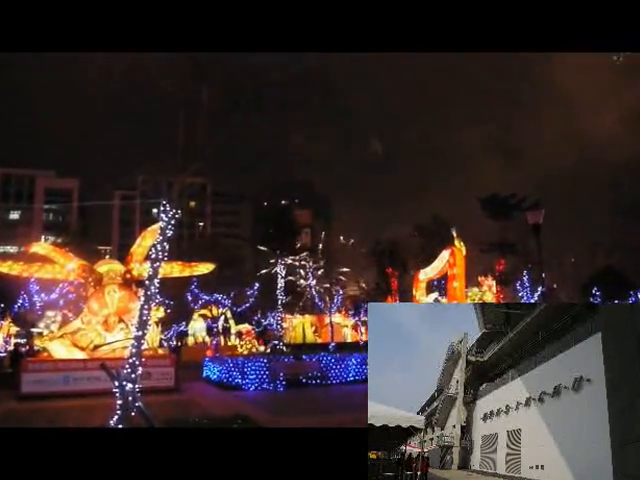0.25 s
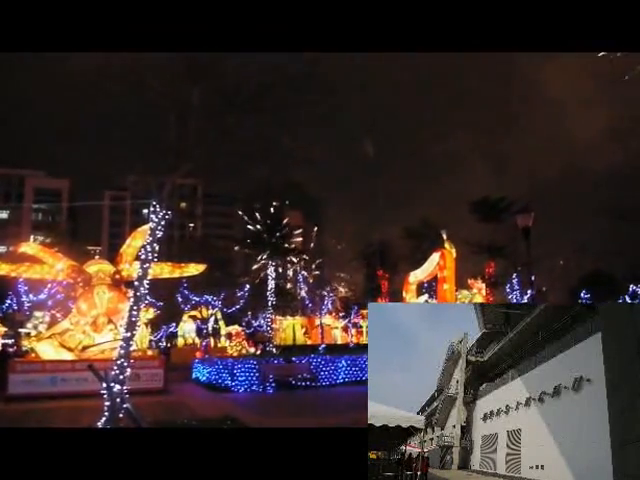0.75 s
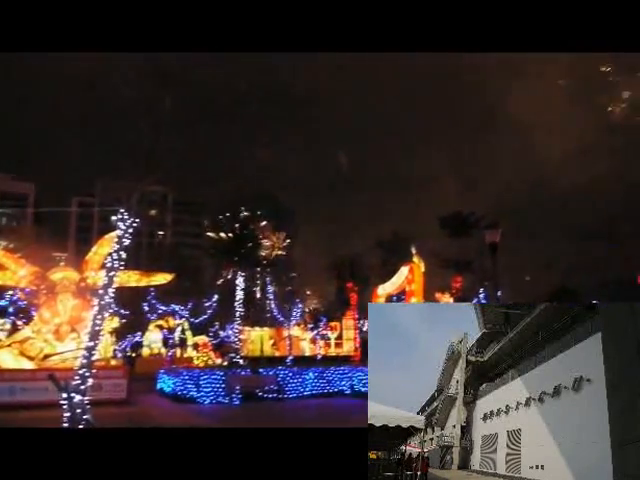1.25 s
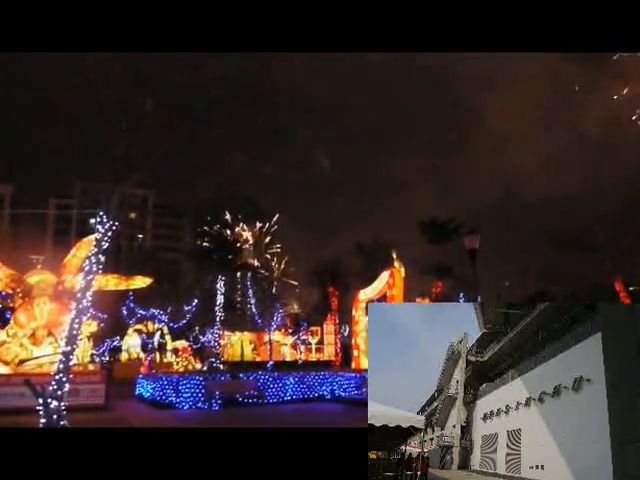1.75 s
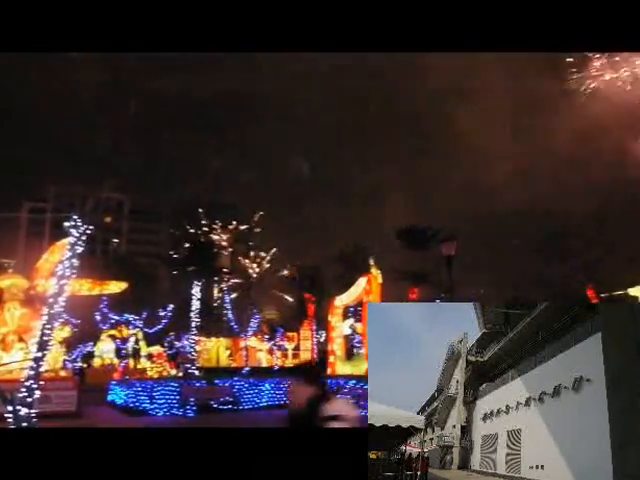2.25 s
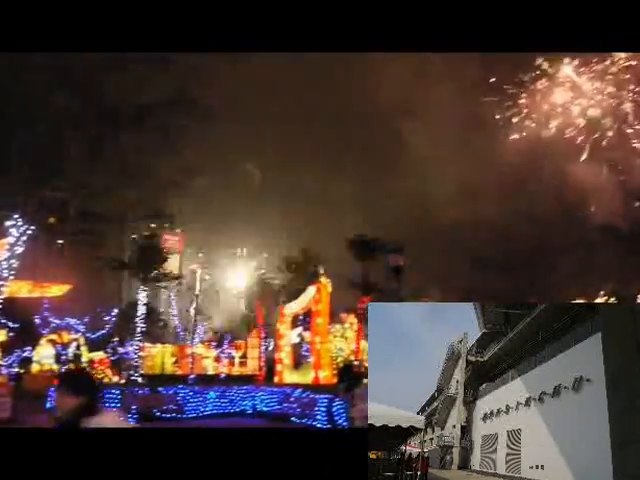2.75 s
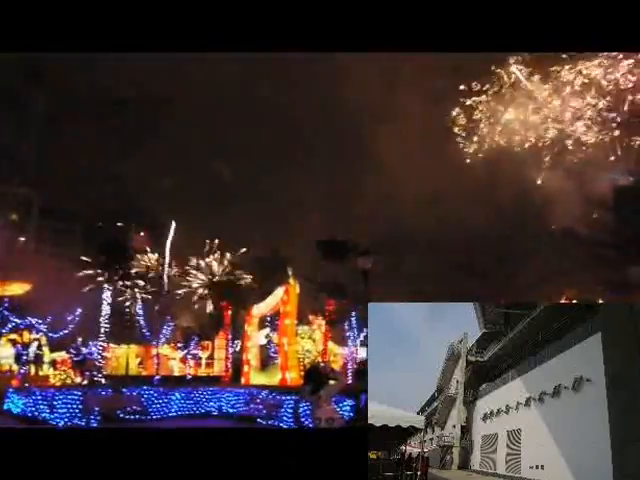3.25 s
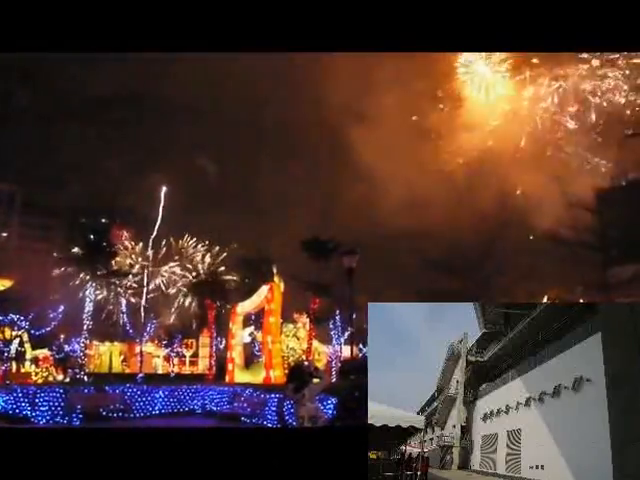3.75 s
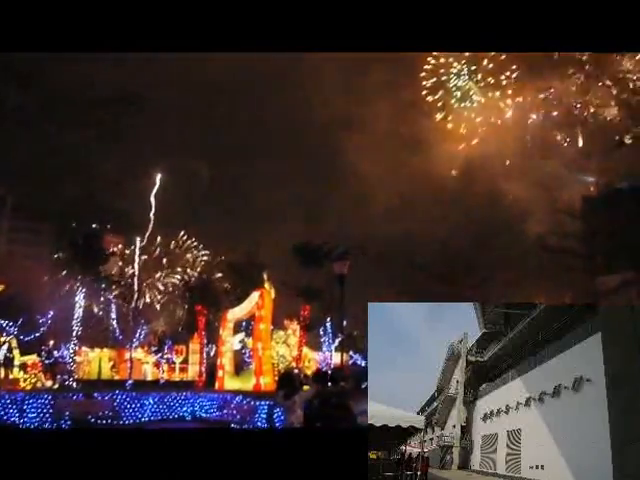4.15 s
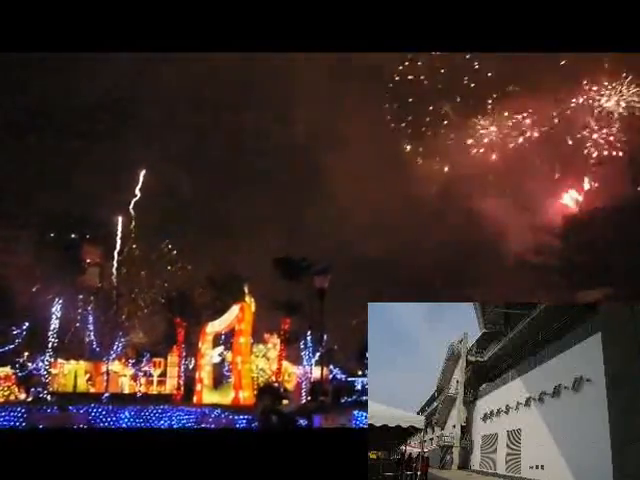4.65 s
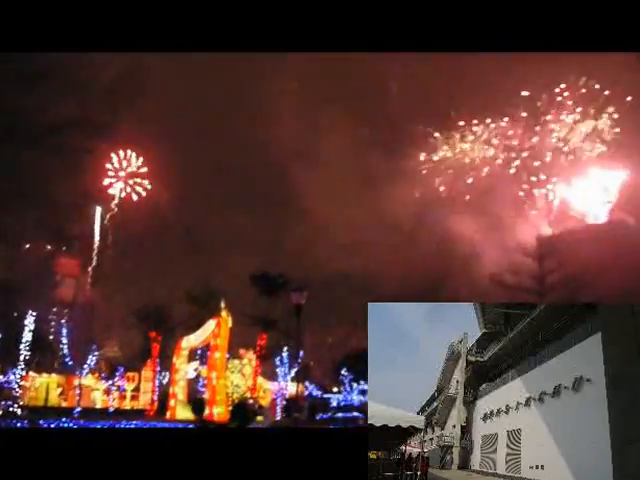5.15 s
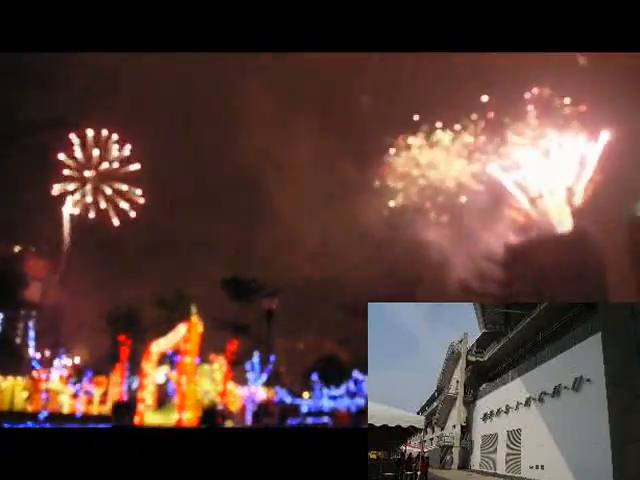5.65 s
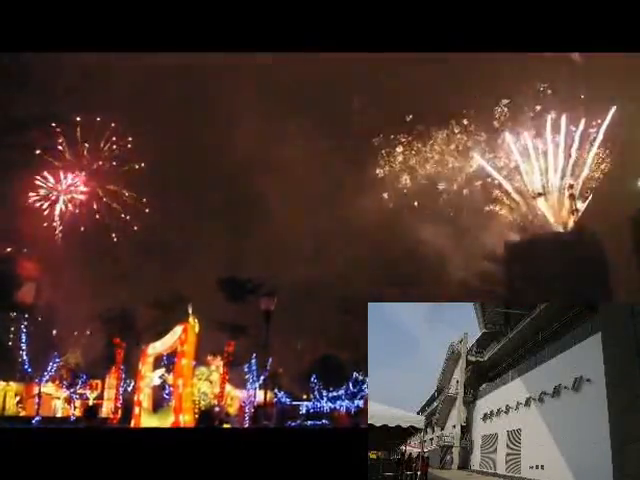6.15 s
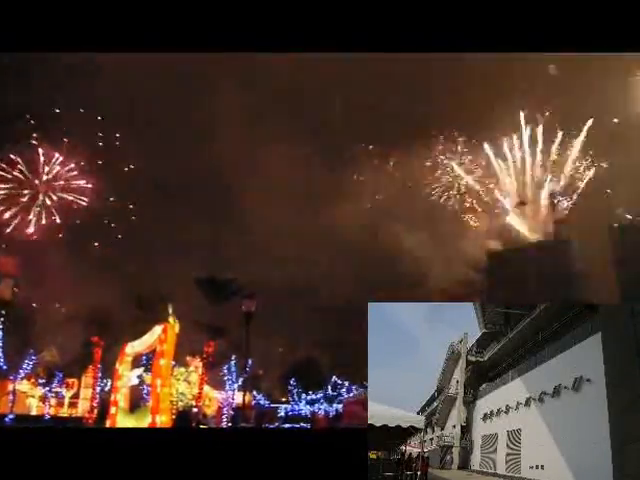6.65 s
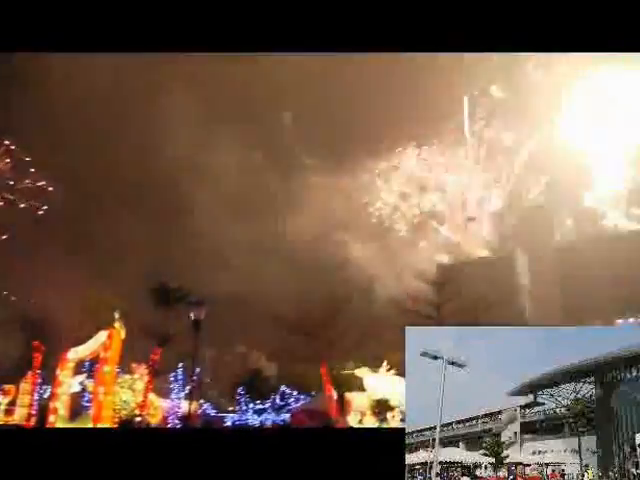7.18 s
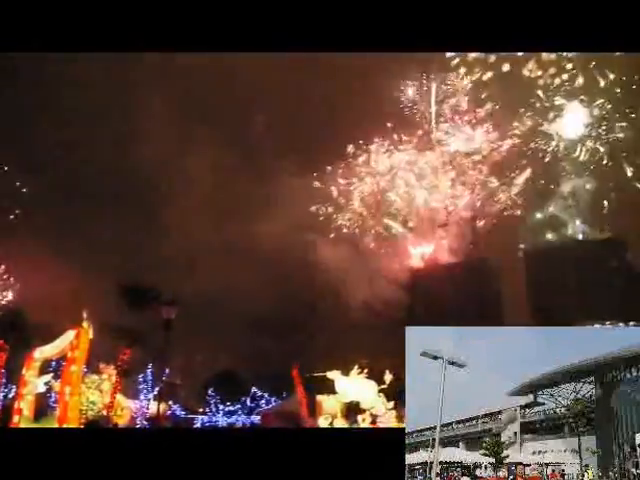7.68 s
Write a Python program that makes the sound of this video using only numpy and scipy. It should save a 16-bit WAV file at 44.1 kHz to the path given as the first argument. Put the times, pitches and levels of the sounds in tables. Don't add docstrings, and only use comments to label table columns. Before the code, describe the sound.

Dense night fireworks over an open square: dry sharp bangs over a constant dull crackling rattle, thinning near six seconds, then a furious closing barrage.

```python
import sys
import numpy as np
from scipy import signal
from scipy.fft import rfft, irfft, next_fast_len
from scipy.io import wavfile
from scipy.ndimage import uniform_filter1d

SR = 44100
rng = np.random.default_rng(int(sys.argv[2]) if len(sys.argv) > 2 else 0)


def master(y):
    cut = np.clip(np.atleast_2d(y).T, -1, 1)
    pcm = np.round(cut * 32767)
    wavfile.write(sys.argv[1], SR, pcm.astype(np.int16))


def linear_from_db(decibels):
    return 10 ** (np.asarray(decibels, float) / 20)


N = 349272


def rms_one(x):
    return x / np.sqrt(np.mean(x ** 2) + 1e-20)


def at_hz(points, hz):
    point_hz, value = np.transpose(points)
    return np.interp(np.log(hz), np.log(point_hz), value)


def band(x, low_hz, high_hz, order=2):
    return signal.sosfilt(signal.butter(order, [low_hz, high_hz], "band", fs=SR, output="sos"), x)


def coloured(x, points):
    size = next_fast_len(N)
    hz = np.maximum(np.arange(size // 2 + 1) * SR / size, 1)
    return irfft(rfft(x, size) * linear_from_db(at_hz(points, hz)), size)[..., :N]


def add(out, at_s, sound):
    i = int(round(at_s * SR))
    out[i:i + len(sound)] += sound[:max(len(out) - i, 0)]


def shock(length_ms, size=700, fade=1.0):
    t = np.arange(size) / SR * 1000 / max(length_ms, .03)
    return (1 - t) * np.exp(-fade * t)


def scatter(draw, first_ms, t60_ms, size=900):
    t = np.arange(size) / SR * 1000
    returns = draw * (t > first_ms) * linear_from_db(-60 * (t / t60_ms) ** 2)
    return returns / np.sqrt(np.sum(returns ** 2))


def bursts():
    cracks, edges, thumps = np.zeros((3, N))
    every = every_burst()
    draws = rng.standard_normal((len(every), 3, 900))
    for (s, db, thump_db, edge_db), (a, b, c) in zip(every, draws):
        returns_db = -14.5 - .55 * max(db, -18) + 0.38 * thump_db
        sparse = a * (np.abs(b) > 1.5)
        returns = scatter(sparse, first_ms=1.6, t60_ms=28.0) * linear_from_db(min(returns_db, -7) + 8.0)

        direct = linear_from_db(1.46 * min(db + 12.5, 0))
        returns[0] = direct
        bounce = 8 + (np.abs(a[:4]) * [6, 18, 35, 60]).astype(int)
        returns[bounce] += direct * linear_from_db(returns_db / 3 - 2.0) * np.tanh(2 * b[:4])
        add(cracks, s, linear_from_db(db) * returns)
        duller = np.exp(-np.arange(900) / 250)
        add(edges, s, linear_from_db(db + edge_db) * returns * duller)

        low = scatter(c, first_ms=1.2, t60_ms=13.5 - 0.33 * db)
        low[0] = 1.14 * direct
        add(thumps, s, linear_from_db(db + min(thump_db, 3)) * low)
    crack = band(np.convolve(cracks, shock(0.32, fade=0.28))[:N], 870, 3450)
    edge = band(edges, 1350, 4830, order=3)
    thump = band(np.convolve(thumps, shock(0.79))[:N], 185, 662, order=1)
    return linear_from_db(8.5) * crack + linear_from_db(14.5) * edge + linear_from_db(17.0) * thump


def every_burst():
    # (time [s], crack peak [dB], thump re crack
    # [dB], edge re crack [dB])
    overhead = [(0.0492, -10, -4, -8.5), (0.2501, -7.5, -5.5, -15), (0.3696, -5.5, -10, -11),
                (0.4493, -6.5, -7, -11), (0.5739, -6.5, -26.5, -16), (0.948, -1.5, -11.5, -9),
                (1.0176, -6, -4.5, -46), (1.4365, -2, -11.5, -9), (1.8513, -7.5, -7, -13),
                (2.0203, -7, -8, -2.5), (2.2187, -11.5, -0.5, -3), (2.4552, -3, -9, -17),
                (2.5353, -9, -5.5, -16), (2.699, -10.5, -6.5, -4), (2.7943, -5.5, -8.5, -8),
                (3.032, -3.5, -10, -4.5), (3.0734, -3.5, -14, -14), (3.2944, -6, -7.5, -3),
                (3.4907, -0.5, -13.5, -21), (3.5002, -5, -9.5, -21), (3.7322, -9.5, -6, -20),
                (3.7836, -5.5, -10.5, 1), (3.9615, -9.5, -11, -24), (4.1648, -2.5, -21.5, -7),
                (4.47, -10.5, -3.5, -9), (5.1257, -18.5, 0.5, -16), (5.2533, -7, -8.5, -4),
                (5.4615, -6.5, -7, -4), (5.5229, -10, -7, -5), (5.796, -12, -6.5, -11)]
    # (time [s], crack peak [dB], thump re crack [dB], edge re crack [dB])
    closing = [(6.74, -6, -4.5, -2), (6.7891, -5.5, -8.5, -7.5), (6.9036, -2, -15.5, -6),
               (6.936, -14.5, -8, -24), (6.969, -11, -2.5, 4), (6.992, -5.5, -7, -9),
               (7.1315, -14.5, -2, 2.5), (7.2348, -13.5, -5, -17), (7.268, -8, -3, 4),
               (7.3519, -10, -5, -1.5), (7.3765, -9.5, -7, -1), (7.4133, -8, -3.5, -8),
               (7.4225, -9, -6, -6), (7.4635, -13, -4.5, 5), (7.4676, -7.5, -17, -11),
               (7.546, -10.5, -5, -1), (7.6204, -9.5, -5, -14), (7.6268, -25, 3, -7),
               (7.6613, -0.5, -10.5, -7.5), (7.6762, -4.5, -8, -9), (7.6941, -33, 1, 2),
               (7.734, -17, -6, -14), (7.7413, -10, -9.5, -14), (7.7685, -11.5, -2, -5),
               (7.794, -17, -2, 0), (7.8158, -5, -14, -3.5), (7.8389, -13, 1, -2), (7.8593, -15, -1, -6),
               (7.874, -7.5, -13, -4), (7.9128, -13, -2, -17)]
    # (time [s], crack peak [dB], thump re crack [dB])
    across_square = [(0.1512, -19.5, -3), (0.3264, -14.5, -5.5), (0.5683, -15, 2), (1.8471, -10, -5.5),
                     (1.8649, -11, -7), (1.9429, -9.5, -12), (1.9843, -15, -8), (1.9899, -13.5, -8),
                     (2.0002, -15.5, -1.5), (2.0842, -13, -22), (2.4637, -17.5, 3), (2.6303, -10.5, -12.5),
                     (2.975, -14.5, -1.5), (3.131, -15, -8), (3.1349, -13.5, -1.5), (3.2163, -17.5, -6.5),
                     (3.273, -14.5, -5.5), (3.2766, -14, -13), (3.521, -13, -3), (3.5251, -24, 2),
                     (3.6298, -14, -4.5), (3.8761, -18.5, -1), (3.926, -19, -8), (4.0928, -13, -6),
                     (4.2312, -10.5, -37), (4.2818, -13, -1), (5.0845, -11, -4.5), (5.122, -15, -7),
                     (5.193, -15.5, -0.5), (5.3603, -8.5, -8)]
    # (time [s], crack peak [dB])
    behind = [(0.0242, -17), (0.346, -28), (0.7131, -17), (0.9984, -21.5), (1.1558, -27.5), (1.161, -17.5),
              (1.18, -18.5), (1.1871, -16), (2.1155, -26), (2.3124, -16), (2.3419, -24.5), (3.4121, -14),
              (3.6356, -16.5), (3.9144, -15), (3.9392, -16.5), (4.2411, -16), (4.3116, -21),
              (5.0924, -15.5), (5.9337, -17), (6.005, -19.5), (6.0599, -19), (6.0963, -15), (6.1997, -23),
              (6.2204, -16.5), (6.2303, -25), (6.3718, -16.5), (6.5709, -24), (7.2091, -18.5),
              (7.2144, -14), (7.448, -16)]

    strays_per_s, stray_db, stray_spread_db = 16, 7, 2.5
    when, luck = rng.random((int(strays_per_s * N / SR), 2)).T
    when = when * (N - 1) / SR
    stray_peak = in_time()[(when * SR).astype(int)] + stray_db + stray_spread_db * (2 * luck - 1)

    across = [(s, db, low, -4.5 + 0.51 * low) for s, db, low in across_square]
    far = [(s, db, -7, -24) for s, db in [*behind, *zip(when, stray_peak)]]
    return [*overhead, *closing, *across, *far]


def shells():
    # (time [s], peak [dB], shock length [ms])
    heavy_shells = [
        (1.4374, 0, 1.6),
        (4.2804, 16, 1.15),
        (5.1216, 14, 1.6),
        (7.2678, 14, 1.5),
        (7.4628, 14, 1.6),
        (7.913, -24, 0.71),
    ]
    out = np.zeros(N)
    for s, db, length_ms in heavy_shells:
        add(out, s, linear_from_db(db) * shock(length_ms, fade=1.65))
    return out


def whistles():
    # (time [s], length [s], start [Hz], end [Hz], level [dB])
    whistling_stars = [
        (2.14, .08, 1320, 1330, -37),
        (4.55, .15, 2620, 2400, -46),
    ]
    out = np.zeros(N)
    for s, length_s, start_hz, end_hz, db in whistling_stars:
        size = int(length_s * SR)
        waver = 250 * uniform_filter1d(rng.standard_normal(9000), size=400)[:size]
        hz = np.linspace(start_hz, end_hz, size) + waver
        tone = np.sin(2 * np.pi * np.cumsum(hz) / SR)
        add(out, s, linear_from_db(db) * np.hanning(size) ** .5 * tone)
    return out


def square(x, t60_s=1.0, start_s=0.016):
    t = np.arange(int(SR * 1.0)) / SR
    tail = rng.standard_normal(len(t)) * linear_from_db(-60 * t / t60_s) * (t > start_s)
    dull = band(tail, 140, 3500, order=1) / np.sqrt(np.sum(tail ** 2))
    return signal.fftconvolve(x, dull)[:N]


def rattle(pops_per_s=45, ticks_per_s=500):
    # (frequency [Hz], level [dB])
    roll_colour = [(24, -93), (40, -44.5), (123, -24), (282, -2.5), (396, 0.5), (674, -4), (967, -3.5),
                   (2170, -6.5), (3760, -17), (6400, -29), (8320, -24), (14100, -120)]
    sizes = linear_from_db(1.4 * np.minimum(rng.exponential(1, N), 3))
    pops = sizes * (rng.random(N) < pops_per_s / SR)
    fall = np.exp(-np.log(1000) / (0.061 * SR))
    swell = 1.0 + 0.6 * signal.lfilter([1], [1, -fall], pops)
    blur = rng.standard_normal((2, N)) * swell / np.sqrt(uniform_filter1d(swell ** 2, size=8000))
    ticks = rms_one(sizes[::-1] * (rng.random(N) < ticks_per_s / SR))
    roll = coloured(blur + linear_from_db(-8) * ticks * [[1], [0]], roll_colour)
    low = rms_one(band(roll, 16, 2147))
    high = rms_one(band(roll, 1556, 10200))
    return linear_from_db(in_time() + 1.5) * low + linear_from_db(in_time() - 5) * high


def in_time():
    # (time [s], level [dB])
    rattle_density = [(0.0, -27.5), (0.88, -27), (1.68, -33.5), (1.83, -29.5), (2.03, -27.5), (2.29, -30.5),
                      (3.6, -31.5), (4.12, -28), (4.72, -33.5), (5.09, -34.5), (5.36, -30.5), (5.93, -32),
                      (6.15, -28.5), (6.75, -30.5), (7.48, -29.5), (7.7, -26), (7.83, -26), (7.92, -26)]
    return np.interp(np.arange(N) / SR, *np.transpose(rattle_density))


def scene():
    # (frequency [Hz], side re mid [dB])
    port_difference = [(40, -46), (100, -36), (300, -31), (1000, -28), (2500, -23), (6000, -18)]
    small, heavy = bursts(), shells()
    light = small + linear_from_db(-28.0) * square(small + heavy)
    no_bass = signal.butter(3, 288, "high", fs=SR, output="sos")
    near = heavy + signal.sosfilt(no_bass, light)
    roll, roll_side = rattle()
    ports = scatter(rng.standard_normal(900), first_ms=0.17, t60_ms=22)
    side = coloured(linear_from_db(3.0) * np.convolve(near, ports)[:N] + roll_side, port_difference)
    mid = near + roll + whistles()
    return np.array([linear_from_db(-.3) * (mid + side), mid - side])


def roll_off(x):
    return signal.sosfilt(signal.butter(12, 15430, fs=SR, output="sos"), x)


def record(dry):
    x = -signal.sosfilt(signal.butter(2, 5800, fs=SR, output="sos"), dry)
    x = np.clip(x, -.87, .97)
    x = signal.sosfilt(signal.butter(8, 9400, fs=SR, output="sos"), x)
    sampling_hz = 16000
    mirror = x * np.cos(2 * np.pi * sampling_hz * np.arange(N) / SR)
    flutter = np.sqrt(uniform_filter1d(band(x, 3500, 9800) ** 2, size=600) + 1e-12)
    common, own = rng.standard_normal((2, N))
    hiss_level = linear_from_db(in_time() - 32) + linear_from_db(-10.0) * flutter
    hiss = hiss_level * (common + .5 * own * [[1], [-1]])
    top = band(linear_from_db(-12.5) * mirror + hiss, 9600, 13600)
    mix = x + top * linear_from_db([[-1.4], [1.4]])
    return roll_off(mix)


dry = scene()
out = record(dry)
master(out)
```